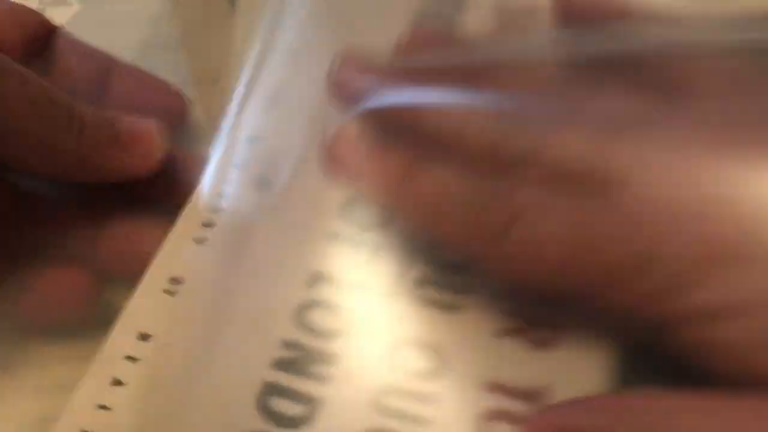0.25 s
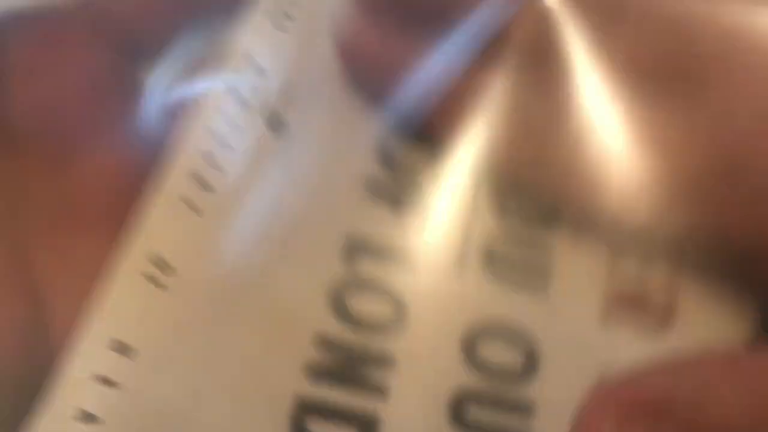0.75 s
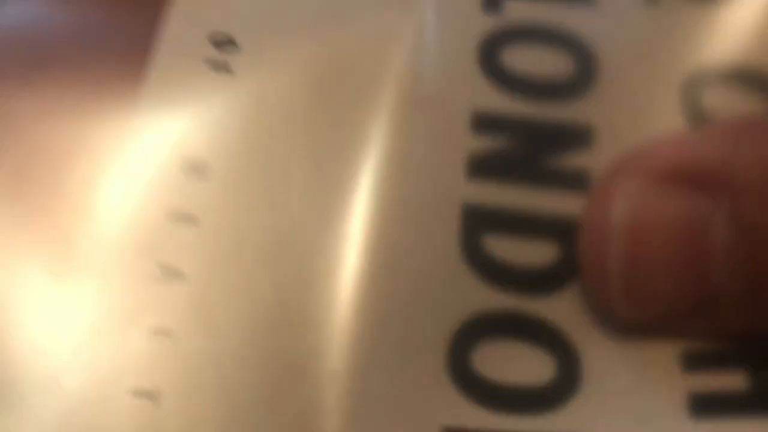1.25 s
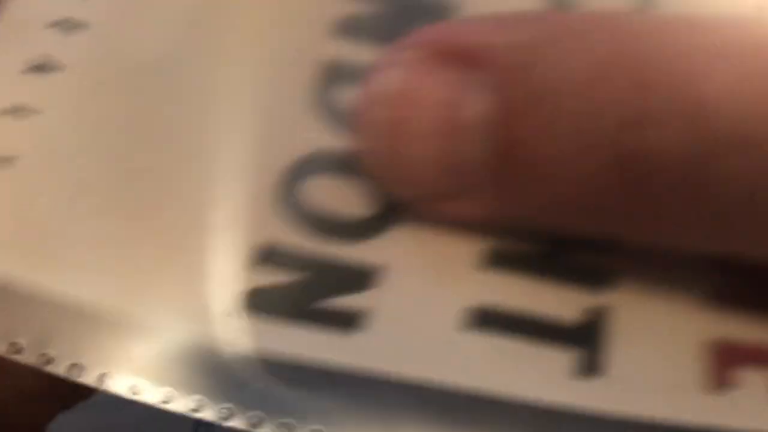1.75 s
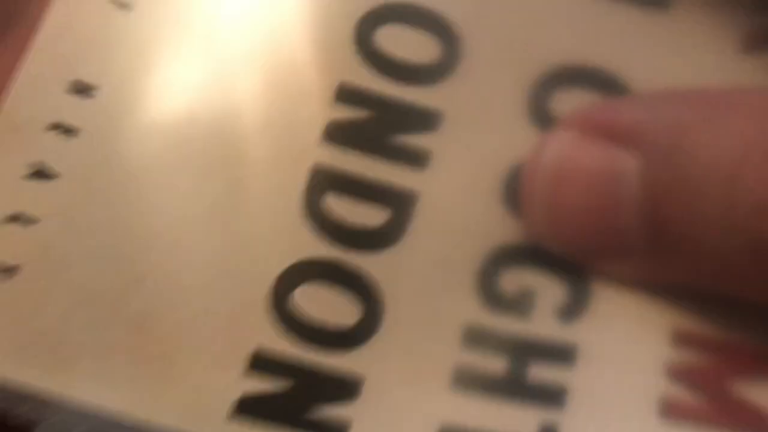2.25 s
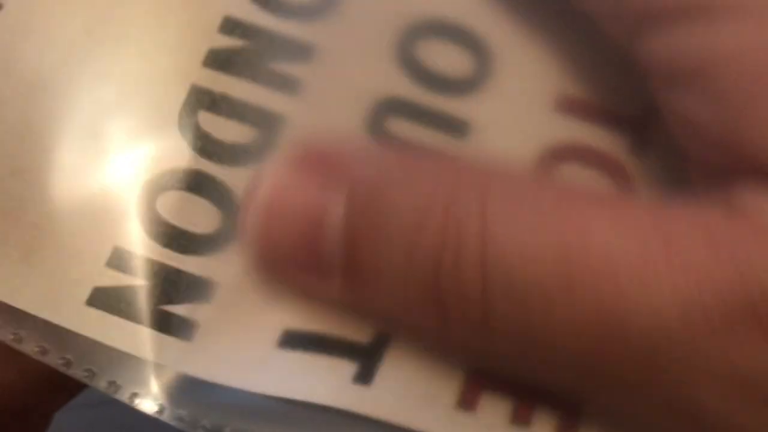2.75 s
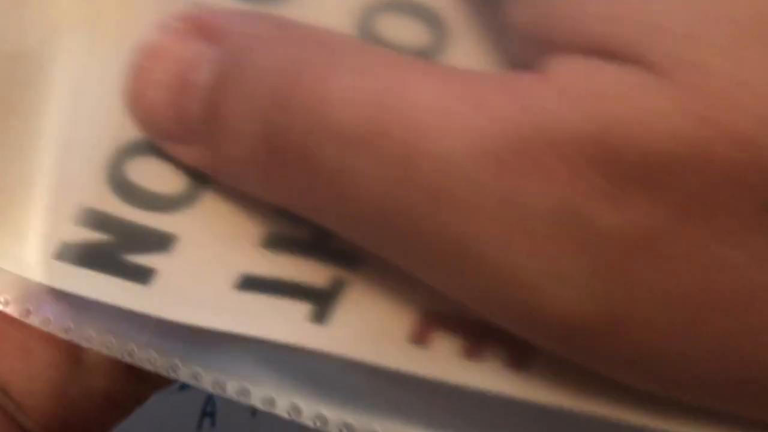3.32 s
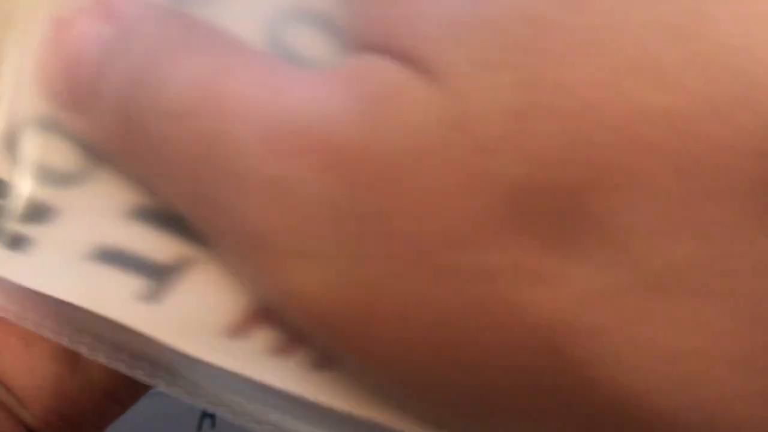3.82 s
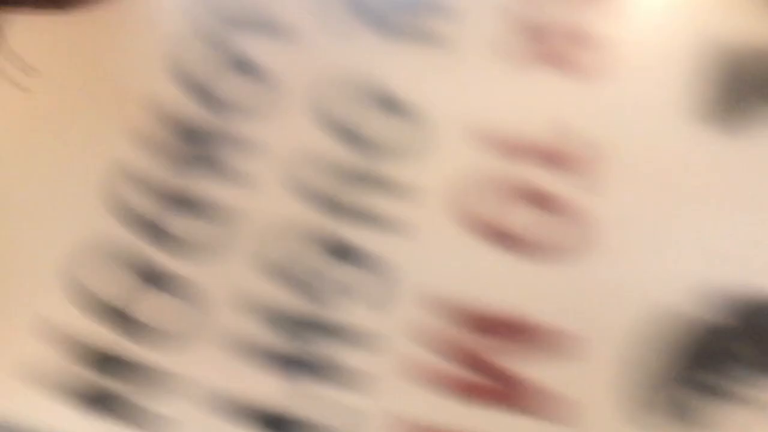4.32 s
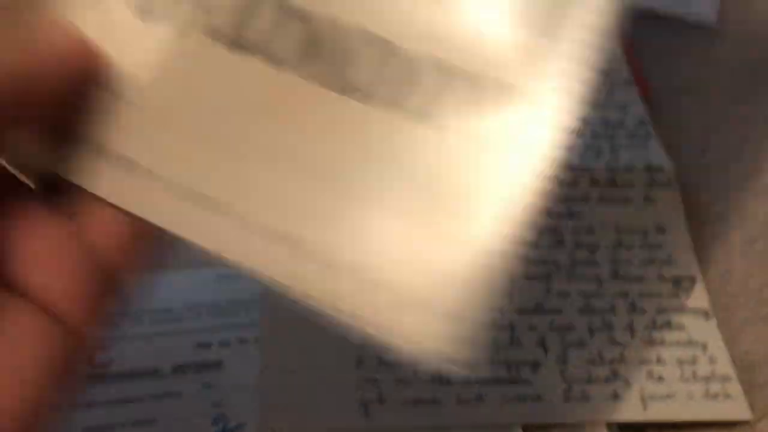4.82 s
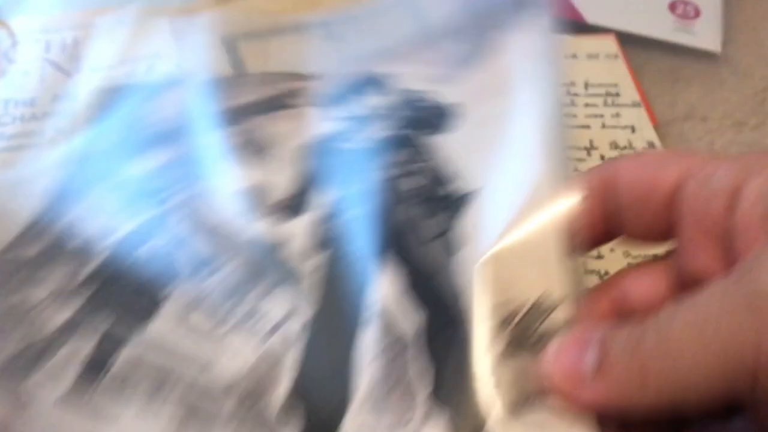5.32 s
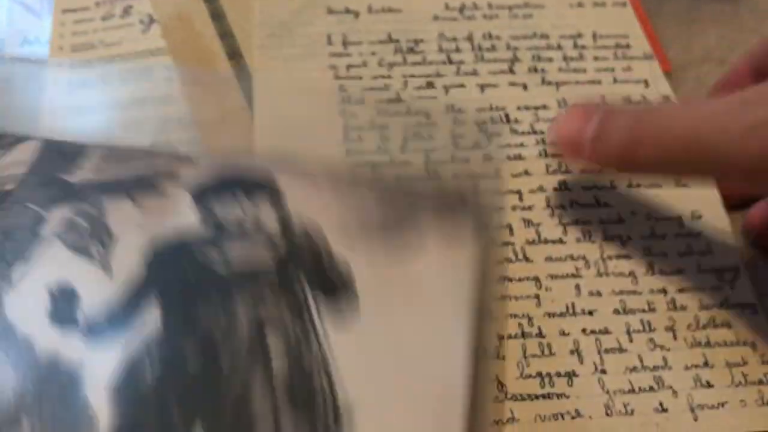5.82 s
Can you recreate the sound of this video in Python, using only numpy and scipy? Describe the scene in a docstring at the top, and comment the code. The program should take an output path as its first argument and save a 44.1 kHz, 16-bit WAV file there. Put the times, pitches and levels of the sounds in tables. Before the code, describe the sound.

Paper and plastic film being handled indoors, dry and close, in mono. Bright scraping strokes alternate with clicks, crinkles and low soft puffs from the flexing sheet. The rubbing is strongest around the middle; afterwards it grows softer and more crackly, with small flicks of the film edge and a faint rubbery squeak just before the end. The room is almost silent.

```python
"""Hiss in strokes, snaps and fine crackle: hands slide a paper sheet in a plastic sleeve, close to a mono phone
microphone in a quiet room. Random micro-slips, coloured and fluttering, make the hiss of skin and paper on film.
Buckles of the film are short rings falling in pitch; the bending sheet adds low air puffs and crease crackle.
Flicks of the film edge are noise bursts; one fingertip squeak is a stick-slip harmonic tone.
Shaped noise makes the room."""
import sys
import numpy as np
from scipy import signal
from scipy.fft import rfft, irfft
from scipy.io import wavfile
from scipy.ndimage import uniform_filter1d

SR = 44100
rng = np.random.default_rng(int(sys.argv[2]) if len(sys.argv) > 2 else 0)


def materialize(psi):
    """Save the field psi as 16-bit PCM at rate SR to the path in sys.argv[1].

    A 1-D psi becomes a single channel; in a 2-D psi each row is a channel.
    """
    bounded = np.clip(np.atleast_2d(psi).T, -1, 1)
    quanta = np.round(bounded * 32767).astype(np.int16)
    wavfile.write(sys.argv[1], SR, quanta)


N = 267246
T = np.arange(N) / SR


def undb(db):
    """Amplitude factor of a level in dB."""
    return 10 ** (np.asarray(db) / 20)


def unit(x):
    """Scale x to rms 1."""
    return x / np.sqrt(np.mean(x ** 2))


def curve(rows):
    """Columns of a table, joined by straight lines in time."""
    s, *columns = np.transpose(rows)
    return [np.interp(T, s, column) for column in columns]


def colour(x, points):
    """Filter x by (Hz, dB) points joined over log frequency, rms 1."""
    hz, db = np.transpose(points)
    f = np.maximum(np.fft.rfftfreq(N, 1 / SR), 1)
    gain = undb(np.interp(np.log(f), np.log(hz), db))
    return unit(irfft(rfft(x) * gain, N))


def resonate(x, hz, q):
    """Band-pass with gain 1 at its centre."""
    b, a = signal.iirpeak(hz, q, fs=SR)
    return signal.lfilter(b, a, x)


def resonate_twice(x, hz, q):
    """Two equal band-passes in series: steeper skirts."""
    return resonate(resonate(x, hz, q), hz, q)


def walk(rate_hz):
    """Random levels, one per 1 / rate_hz seconds, joined by ramps; spread near 1."""
    hold = int(SR / rate_hz)
    steps = np.repeat(rng.standard_normal(N // hold + 1), hold)
    return uniform_filter1d(steps, hold)[:N]


def slips(rate_hz, spread_db):
    """Random tiny slips: rate_hz a second on average, a few stronger than the rest."""
    hit = rng.random(N) < rate_hz / SR
    boost_db = spread_db * np.minimum(rng.exponential(size=N), 3.0)
    return hit * rng.standard_normal(N) * undb(boost_db)


# strokes over the film: (start [s], length [s], hiss level [dB], swell from start to end [dB],
# sag at both ends [dB], body re hiss [dB], top re hiss [dB])
STROKE_ROWS = [(0, 0.16, -61, -4.5, -8, 3.5, -6), (0.176, 0.044, -45.5, -8, 3, -3.5, -12),
               (0.235, 0.14, -50, 4, 14, 0, -9), (0.38, 0.2, -63, -8, 6, 6, 1),
               (0.574, 0.11, -54, -2.5, 3, 8, 0), (0.701, 0.42, -62.5, -0.5, 1, 4.5, -1.5),
               (1.149, 0.18, -50, 4.5, -4.5, 0, -1), (1.353, 0.15, -62.5, 0, -2, 1.5, 1),
               (1.514, 0.083, -45.5, -5, 1, 0.5, 0.5), (1.632, 0.16, -42, 3.5, 6.5, -1.5, -1),
               (1.784, 0.16, -46, -10.5, 1, 1.5, -2), (1.92, 0.62, -59.5, 0.5, -3, 1.5, 0),
               (2.531, 0.15, -48, 3.5, 9, 1.5, -1), (2.691, 0.057, -59, 7, 4, 2, -4),
               (2.801, 0.1, -55.5, 1, 0, 1.5, -3), (2.867, 0.12, -45, 3, -0.5, 3.5, -2.5),
               (3.031, 0.12, -43, -6.5, 5, 0, -0.5), (3.162, 0.011, -46, 4, 2, -9, 1),
               (3.187, 0.028, -36.5, -2.5, 3, -10.5, -6), (3.23, 0.046, -44.5, 1.5, -0.5, -5, 0),
               (3.287, 0.11, -47, 5.5, 1.5, 2, -2.5), (3.405, 0.15, -55, -1.5, 8.5, 3, -3),
               (3.562, .15, -46.5, -6, 0.5, -4.5, -5.5), (3.721, 0.16, -42.5, 6, 4.5, -5.5, -1.5),
               (3.887, 0.1, -58, 0.5, -9.5, -5, -2), (3.989, 0.16, -52.5, -3, 6.5, -2, 2),
               (4.137, 0.24, -57.5, 0, 1, 1, 2.5), (4.397, 0.15, -61.5, 1, -1, -4, 3.5),
               (4.544, 0.13, -57.5, 1.5, -2.5, 0.5, 1.5), (4.81, 0.019, -54.5, -12, -1, -2.5, -18),
               (4.845, 0.21, -62.5, 5, -3, -24, -2.5), (5.092, 0.073, -60, -12, 0.5, -3, -1),
               (5.336, 0.088, -51.5, -7, 15.5, -0.5, 5.5), (5.506, 0.092, -64.5, 13, 18, 10.5, 1),
               (5.636, 0.15, -53, -5, 5.5, 1.5, -2), (5.793, 0.26, -52.5, 8, -1.5, -7.5, -3.5)]
GRIP_S, LIFT_S = 0.011, 0.017  # time for a tenfold amplitude change outside the stroke
REST_HISS_DB = -70.5  # hands at rest on the film


def strokes():
    """Gains of hiss, body, top: strokes grip, swell, sag at the ends, lift off; overlaps add power."""
    hiss = body = top = undb(REST_HISS_DB) ** 2
    for s, length_s, db, swell_db, sag_db, body_db, top_db in STROKE_ROWS:
        along = np.clip((T - s) / length_s, 0, 1) - .5
        grip = np.minimum((T - s) / GRIP_S, 0)
        lift = np.minimum((s + length_s - T) / LIFT_S, 0)
        level_db = db + swell_db * along - sag_db * (2 * along) ** 2 + 20 * (grip + lift)
        power = undb(level_db) ** 2
        hiss = hiss + power
        body = body + power * undb(body_db) ** 2
        top = top + power * undb(top_db) ** 2
    return np.sqrt(hiss), np.sqrt(body), np.sqrt(top)


def patches(grain, centres_hz, flutter_db):
    """The contact patch wanders, so each part of the spectrum flutters on its own."""
    return sum(undb(flutter_db * walk(35.)) * resonate(grain, hz, 1.8) for hz in centres_hz)


# filter on the hiss of the film: (frequency [Hz], relative level [dB])
HISS_FILTER = [(1800, -61), (3200, -5.5), (5000, -0.5), (9000, -2.5), (13000, -4), (16000, -7.5)]
# filter on the body of the hiss: (frequency [Hz], relative level [dB])
BODY_FILTER = [(290, -60), (500, 0), (742, -3), (1060, 3), (1390, 1), (2380, 2.5), (4920, 0), (7800, -5.5),
               (13200, -120)]
BODY_FLUTTER_DB = 2.8
TOP_FROM_HZ = 9300  # the top of the hiss starts here


def slide():
    """Dense micro-slips of skin and paper on the film, in hiss, body and top bands."""
    hiss_gain, body_gain, top_gain = strokes()
    grain = slips(15000., 0.73)
    grit = grain + 0.64 * slips(2300.0, 1.1)
    hiss = colour(patches(grain, (4400.0, 6770.0, 9530.0, 13200.0), 3.5), HISS_FILTER)
    body = colour(patches(grit, (815.0, 1580.0, 2290.0, 3310.0), BODY_FLUTTER_DB), BODY_FILTER)
    top = signal.sosfiltfilt(signal.butter(2, TOP_FROM_HZ, "high", fs=SR, output="sos"), hiss)
    mix = hiss_gain * (hiss - top) + top_gain * top + body_gain * body
    return undb(1.17 * walk(70.)) * mix


THUD_HZ, THUD_SPREAD = 250., .22  # median pitch, spread of its natural log
CLEAN_DB_PER_DB = .7  # loss of rag per dB above -29; the tail loses half


def snap(db, hz, length_ms, tick_db, thud_db, chance):
    """One buckle: bending waves spread out, treble first, so the ring falls in pitch; tick, tail, thud."""
    t = np.arange(len(chance)) / SR
    life_s = length_ms / 1000
    rise = (1 - np.exp(-t / (0.14 * life_s))) ** 2  # a wider fold lets go more slowly
    pitch_hz = hz * (0.823 + 0.782 * np.exp(-t / (0.51 * life_s)))
    ring_decay = np.exp(-(t / (0.39 * life_s)) ** 1.28)
    ring = np.sin(2 * np.pi * np.cumsum(pitch_hz) / SR) * rise * ring_decay

    scatter = resonate_twice(chance * rise * np.exp(-t / (0.41 * life_s)), hz, 0.97)
    scatter = scatter / np.abs(scatter).max()
    # long buckles are ragged, short or loud ones cleaner
    rag = undb(-CLEAN_DB_PER_DB * max(db + 29, 0))
    body = -ring + 0.36 * rag * length_ms * scatter

    low_noise = unit(resonate(resonate(chance[::-1], 0.5 * hz, 1.0), 0.41 * hz, 0.89))
    tail = 0.3 * np.sqrt(rag) * low_noise * np.exp(-t / 0.0052)
    tick = resonate(chance, 3900.0, 0.86) * np.exp(-t / 0.0014)
    thud_hz = THUD_HZ * np.exp(THUD_SPREAD * chance[0])
    thud = np.sin(2 * np.pi * thud_hz * t) * (1 - np.exp(-t / 0.00032)) * np.exp(-t / 0.0048)
    return body / np.abs(body).max() + tail + undb(tick_db) * tick + undb(thud_db) * thud


# buckles of the film: (time [s], body peak [dB], nominal pitch [Hz], length scale [ms],
# treble tick gain re body peak [dB], thud gain re body peak [dB])
SNAP_ROWS = [(0.2796, -29, 1710, 4.1, -21, -16), (0.3137, -35.5, 1150, 2.5, 3, 2.5),
             (0.62, -20.5, 2220, 0.77, -11, -29), (0.664, -35, 1970, 3.5, 6.5, -17),
             (0.6751, -31, 1110, 4.3, -40, -21), (0.731, -32.5, 1800, 2.8, -40, -29),
             (0.8058, -25.5, 1353, 8.2, 2, -8), (0.9489, -34, 1770, 1.53, -31, -9.5),
             (1.1466, -38.5, 2020, 0.99, 5, 3), (1.278, -26, 2220, 2.4, -36, -10.5),
             (1.5783, -28.5, 3160, 1.15, 4.5, -9.5), (1.7903, -18.5, 1650, 1, -7, -18),
             (1.7974, -15, 1390, 2.64, -23, -16), (1.866, -27, 2820, 2.7, -19, -12),
             (1.886, -34, 900, 3.3, -40, -3), (2.012, -24, 1190, 3.7, -1, -3.5),
             (2.0341, -27, 1020, 2.8, -31, -9), (2.049, -28, 1030, 3.6, -31, -5),
             (2.107, -36, 865, 4.7, -40, -2), (2.1522, -26, 835, 3.3, -36, -4.5),
             (2.325, -24, 1770, 2.8, -27, -7.5), (2.3956, -7.5, 2030, 1.13, -11.5, -26),
             (2.4082, -22, 1230, 2.5, -40, -9.5), (2.4729, -35.5, 2270, 5.4, 4.5, -13),
             (2.902, -37.5, 392, 4.4, -40, -17), (3.5477, -29.5, 1210, 4.2, -27, -21),
             (3.8337, -22.5, 4100, 1.5, -5, -30), (3.835, -14, 1470, 3.1, -17, -15.5),
             (3.895, -37.5, 506, 3, -40, -1.5), (4.0355, -24.5, 1100, 6.4, -37, -18),
             (4.2512, -31.5, 960, 5.8, -40, -1.5), (4.418, -22.5, 1670, 1.5, -26, -6),
             (4.4352, -31, 670, 3.7, -40, 0), (4.4597, -28, 990, 6.2, -40, -13),
             (4.4988, -29.5, 1020, 5.2, -40, -9), (4.617, -36, 1350, 6.7, -40, -8),
             (4.669, -31.5, 755, 3.6, -27.5, 0), (4.68, -31.5, 1120, 7.9, -26, -4),
             (4.704, -33, 1610, 5.7, -22, -5), (4.729, -37, 870, 6.9, -40, -5),
             (4.8078, -30, 1890, 3.9, 0.5, -12), (4.999, -36, 676, 7.3, -35, 2),
             (5.032, -38.5, 1200, 6.3, -23, -4), (5.0792, -23, 1120, 4.4, -18, -30),
             (5.112, -30, 910, 8.2, -9, 0), (5.152, -40, 640, 7.7, -40, 0), (5.2, -31, 1430, 1.2, -19, -18),
             (5.2416, -25, 1223, 4.4, -40, -16), (5.502, -27.5, 1430, 1.34, -23, -18),
             (5.564, -36, 1260, 6.9, -40, -10), (5.5944, -34, 2440, 3.2, -2, -16),
             (5.603, -27.5, 660, 3.2, -29, -3.5), (5.6425, -28.5, 2370, 1.6, -25, -27),
             (5.712, -29, 1240, 2.8, -1.5, -10.5), (5.7981, -35.5, 2420, 1.4, -15, -6),
             (5.8227, -29.5, 2970, 0.5, 0, -36), (5.849, -27, 740, 1.8, -8, -6.5),
             (5.863, -32, 1740, 2, -1, -20), (5.9716, -33.5, 790, 7.4, -16, -6),
             (6.0175, -32.5, 810, 1.4, -26, -4), (6.027, -28.5, 2420, 8, -30, -24)]


def snaps():
    """Film buckles, each with its own pitch and ring."""
    size = 2048
    out = np.zeros(N + size)
    for (s, db, *shape), chance in zip(SNAP_ROWS, rng.standard_normal((len(SNAP_ROWS), size))):
        i = int(s * SR)
        out[i:i + size] += undb(db) * snap(db, *shape, chance)
    return out[:N]


# bends of the sheet: (deepest at [s], width [s], air puff level [dB], crackle level [dB])
BEND_ROWS = [(0.039, 0.079, -49.5, -60), (.215, 0.044, -54, -61), (.32, 0.044, -42, -56),
             (.615, 0.057, -45, -51), (.69, 0.046, -45, -64), (0.82, 0.034, -43, -46),
             (.895, 0.022, -48, -57), (.97, 0.083, -47.5, -64), (1.152, 0.035, -47, -62),
             (1.214, 0.03, -42, -53.5), (1.311, 0.045, -43.5, -50.5), (1.461, 0.063, -44.5, -55.5),
             (1.56, 0.024, -50, -52.5), (1.815, 0.12, -43.5, -59), (2.019, 0.047, -41.5, -43.5),
             (2.065, 0.026, -39, -47), (2.13, 0.068, -41.5, -47), (2.196, 0.037, -31, -45),
             (2.315, 0.047, -43, -51.5), (2.411, 0.035, -36.5, -51), (2.489, 0.033, -33, -50.5),
             (2.608, 0.043, -42.5, -51.5), (2.7, 0.31, -52, -59.5), (3.085, 0.14, -46.5, -61),
             (3.35, 0.094, -43.5, -54.5), (3.47, 0.15, -49.5, -67), (3.564, 0.047, -50, -60),
             (3.84, 0.022, -34, -50.5), (3.903, 0.017, -38, -55), (4.04, 0.054, -46.5, -51.5),
             (4.19, 0.24, -51, -63.5), (4.261, 0.022, -46, -47), (4.355, 0.04, -41.5, -58),
             (4.465, 0.065, -39, -48.5), (4.56, 0.054, -46.5, -50.5), (4.681, 0.064, -42.5, -46.5),
             (4.815, 0.033, -55, -53), (5.002, 0.016, -41.5, -53), (5.05, 0.06, -45, -52),
             (5.11, 0.044, -49, -50.5), (5.16, 0.033, -48, -60), (5.244, 0.018, -53, -43),
             (5.51, 0.055, -56, -57), (5.6, 0.082, -55, -50.5), (5.69, 0.06, -55, -51.5),
             (5.85, 0.029, -47.5, -45.5), (5.919, 0.026, -46, -52.5), (6.011, 0.053, -56, -50.5)]
BEND_IN_DB, BEND_OUT_DB = 18, 13  # drop one width before and one width after the deepest point
REST_PUFF_DB, REST_CRACKLE_DB = -60.5, -67.5


def bends():
    """Gains of puffs and crackle: both grow into each bend and die away after it."""
    puff, crackle = undb(REST_PUFF_DB) ** 2, undb(REST_CRACKLE_DB) ** 2
    for s, width_s, puff_db, crackle_db in BEND_ROWS:
        slope_db = np.where(T < s, BEND_IN_DB, BEND_OUT_DB)
        shape = undb(-slope_db * np.abs(T - s) / width_s) ** 2
        puff = puff + shape * undb(puff_db) ** 2
        crackle = crackle + shape * undb(crackle_db) ** 2
    return np.sqrt(puff), np.sqrt(crackle)


def wobble(hz):
    """A slack panel of the sheet swings at a rate that wanders with the grip."""
    return np.sin(2 * np.pi * np.cumsum(hz * np.exp(0.38 * walk(40.))) / SR)


# filter on the noise in the air puffs: (frequency [Hz], relative level [dB])
PUFF_FILTER = [(20, -42.5), (38, -5.5), (59, 4.5), (129, -3.5), (156, -3), (327, -15), (520, -27.5),
               (880, -120)]
CREASE_SPREAD_DB = 4.5
# crease bands: (centre [Hz], slips per second [1/s], level [dB])
CREASE_BANDS = ((317.0, 400., -2.5), (661.0, 600., -0.5), (1245.0, 700., -4.5),
                (2160.0, 930.0, -12.5), (6500., 250., -25))


def flex():
    """The bending sheet pumps air at the microphone and lets off small creases."""
    puff_gain, crackle_gain = bends()
    air = colour(rng.standard_normal(N), PUFF_FILTER)
    puffs = unit(0.54 * wobble(58.) + 0.38 * wobble(120.) + 0.96 * air)
    creases = np.zeros(N)
    for hz, rate_hz, db in CREASE_BANDS:
        crackle = unit(resonate_twice(slips(rate_hz, CREASE_SPREAD_DB), hz, 1.47))
        creases += undb(db + 2.6 * walk(30.)) * crackle
    return puff_gain * undb(3.1 * walk(24.96)) * puffs + crackle_gain * creases


# tiny flicks of the film edge: (time [s], peak [dB], centre pitch [Hz])
FLICK_ROWS = [(.033, -33, 1500), (.04, -36, 2800), (0.308, -34, 1600), (.397, -46, 2500),
              (.478, -36.5, 1170), (.58, -36, 1800), (.6089, -30.5, 1000), (0.649, -37, 1300),
              (.838, -37.5, 1500), (.862, -46, 2500), (1.066, -38, 2200), (1.49, -43, 1000),
              (1.993, -40, 900), (2.122, -38, 1300), (2.178, -33, 1500), (2.19, -33.5, 6000),
              (2.2212, -36.5, 7000), (2.498, -34, 1000), (3.4897, -43, 1500), (3.528, -33.5, 1310),
              (3.609, -38, 2500), (3.7095, -42, 2500), (4.4482, -34, 4500), (4.476, -41, 7000),
              (4.515, -42, 1200), (4.546, -36.5, 1090), (4.577, -33, 2100), (5.328, -44, 2800),
              (5.36, -36, 4250), (5.404, -38, 1800), (5.451, -40.5, 1500), (5.5146, -36, 2200),
              (5.838, -32, 900), (5.8835, -38, 7440), (5.997, -37, 597)]
FLICK_DECAY_S = 0.0024


def flicks():
    """Film-edge flicks: decaying noise, broadly band-passed around each pitch."""
    size = 512
    out = np.zeros(N + size)
    for (s, db, hz), chance in zip(FLICK_ROWS, rng.standard_normal((len(FLICK_ROWS), size))):
        i = int(s * SR)
        flick = resonate(chance * np.exp(-T[:size] / FLICK_DECAY_S), hz, 1.8)
        out[i:i + size] += undb(db) * flick / np.abs(flick).max()
    return out[:N]


# fingertip stick-slip: (time [s], slip rate [Hz], level [dB], boost of odd harmonics [dB])
SQUEAK_ROWS = [(5.636, 470, -47, -7), (5.648, 474, -42, -3), (5.659, 444, -40, -4), (5.668, 500, -37.5, 4),
               (5.677, 437, -38, -8), (5.689, 512, -40, -4), (5.696, 506, -47, -14), (5.71, 520, -52, -14)]
# one row per harmonic, from the first: level [dB]
HARMONICS_DB = [1.5, 4, -0.5, -13, -23]
SLIP_JITTER = .035  # share of the slip rate


def squeak():
    """A fingertip sticks and slips at an unsteady rate; each slip also scrapes."""
    hz, db, odd_db = curve(SQUEAK_ROWS)
    phase = 2 * np.pi * np.cumsum(hz * (1 + SLIP_JITTER * walk(300.))) / SR
    tone = np.zeros(N)
    for order, order_db in enumerate(HARMONICS_DB, 1):
        level_db = order_db + order % 2 * odd_db + 2.0 * walk(200.)
        tone += undb(level_db) * np.sin(order * phase)
    scrape = (1 + np.cos(phase)) * unit(resonate(rng.standard_normal(N), 570.0, 4.2))
    on = (T > SQUEAK_ROWS[0][0]) & (T < SQUEAK_ROWS[-1][0])
    return on * undb(db + 1.6 * walk(250.)) * (unit(tone) + 0.16 * scrape)


# filter on the room noise: (frequency [Hz], relative level [dB])
ROOM_FILTER = [(20, -32), (45, 5), (100, 8), (250, -20), (2000, -45), (16000, -35)]
ROOM_DB = -76.5


def room():
    """Steady room noise, strongest in the bass."""
    return undb(ROOM_DB) * colour(rng.standard_normal(N), ROOM_FILTER)


def scene():
    """All layers; one microphone feeds both channels."""
    mono = slide() + snaps() + flex() + flicks() + squeak() + room()
    return np.array([mono, mono])


# narrow dips in the microphone response: (centre [Hz], width [Hz], depth [0-1])
MIC_DIP_ROWS = [(4950, 290, 0.54), (7680, 700, 0.31), (10440, 950, 0.45)]
BASS_CUT_HZ, TOP_CUT_HZ = 33., 15800


def record(dry):
    """The microphone has a few narrow dips and no deep bass; the phone cuts the top."""
    for hz, width_hz, depth in MIC_DIP_ROWS:
        dry = dry - depth * resonate(dry, hz, hz / width_hz)
    dry = signal.sosfilt(signal.butter(3, BASS_CUT_HZ, "high", fs=SR, output="sos"), dry)
    return signal.sosfilt(signal.ellip(10, .2, 70, TOP_CUT_HZ, fs=SR, output="sos"), dry)


dry = scene()
out = record(dry)
materialize(out)
```